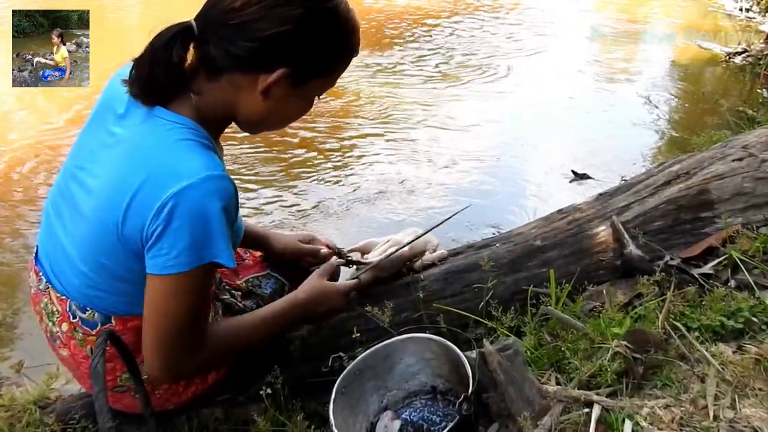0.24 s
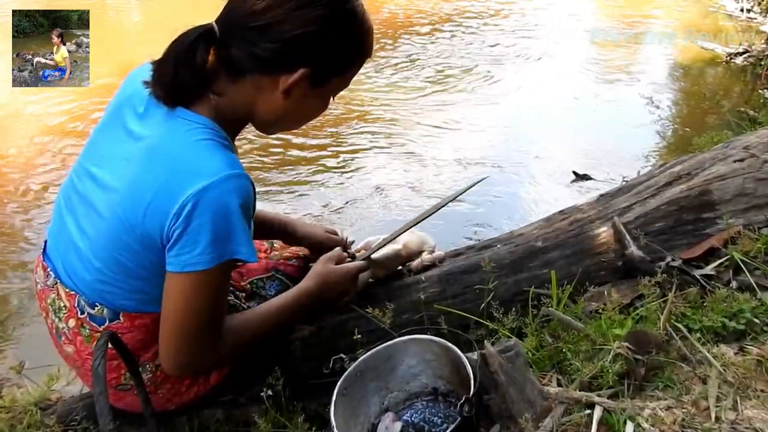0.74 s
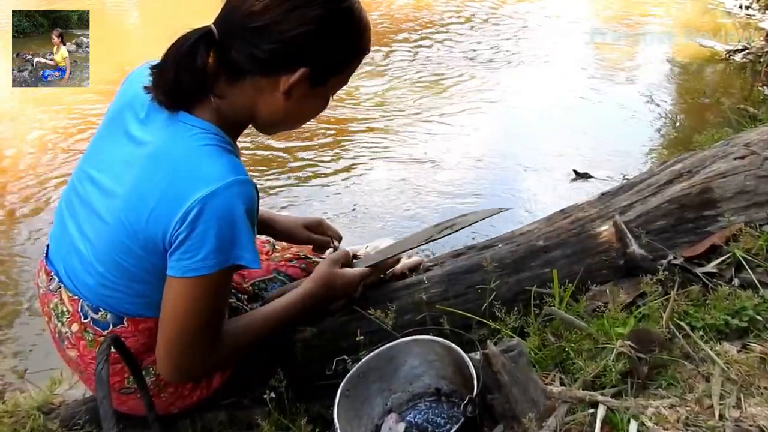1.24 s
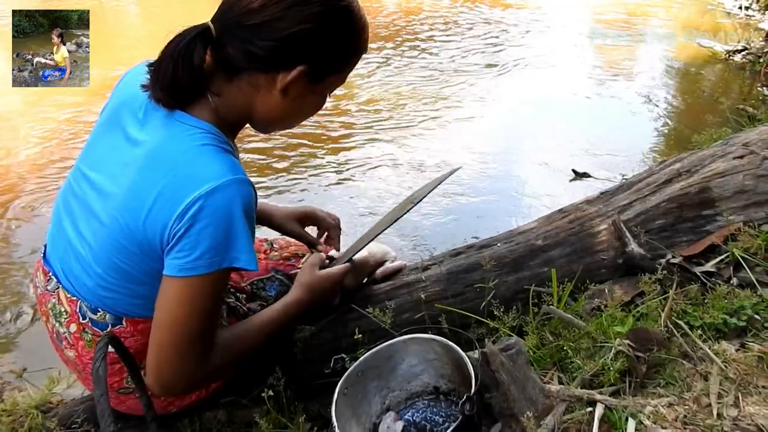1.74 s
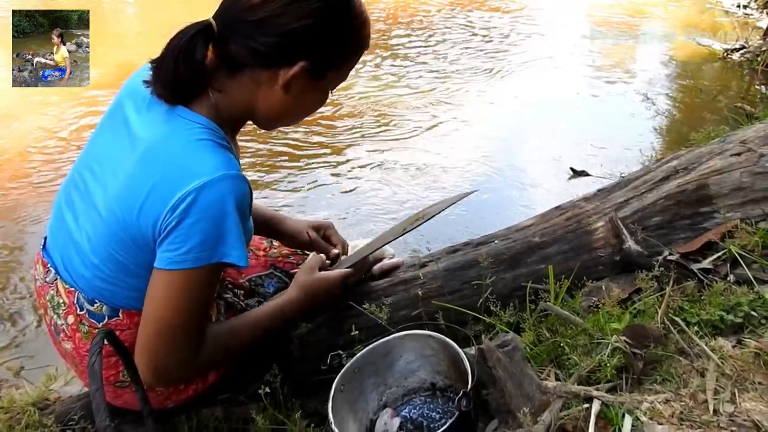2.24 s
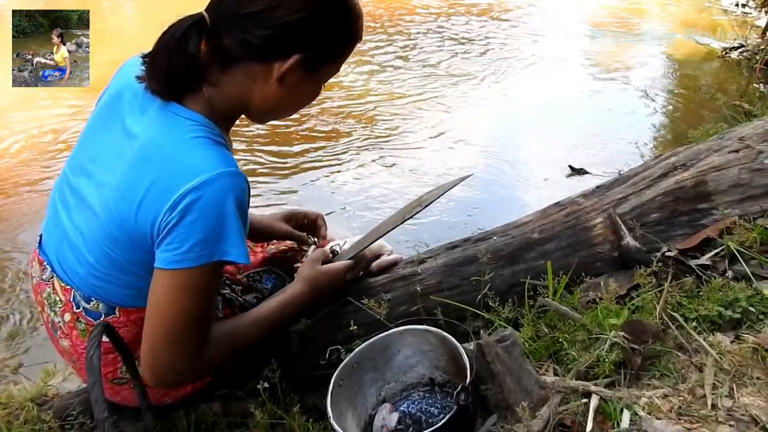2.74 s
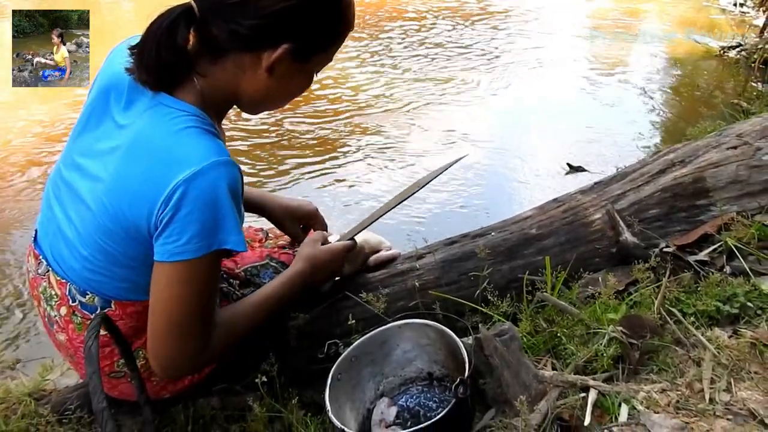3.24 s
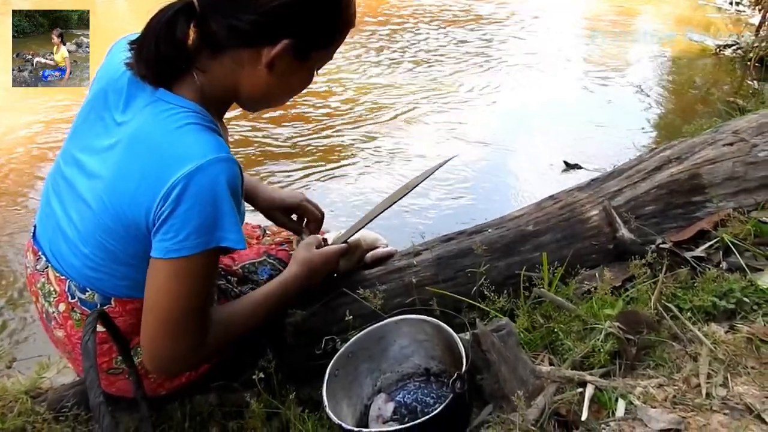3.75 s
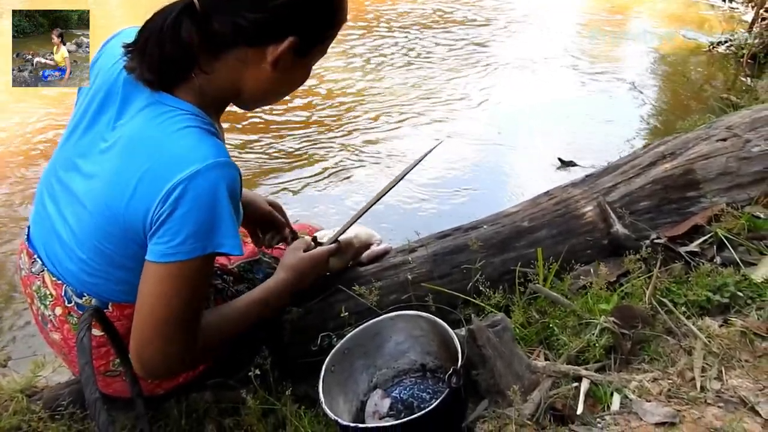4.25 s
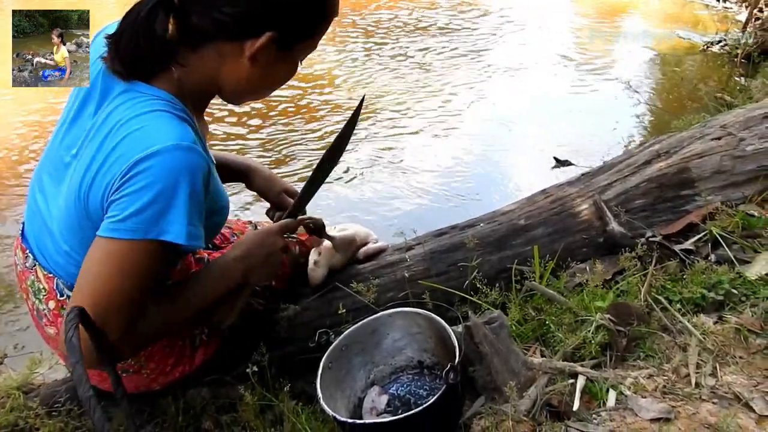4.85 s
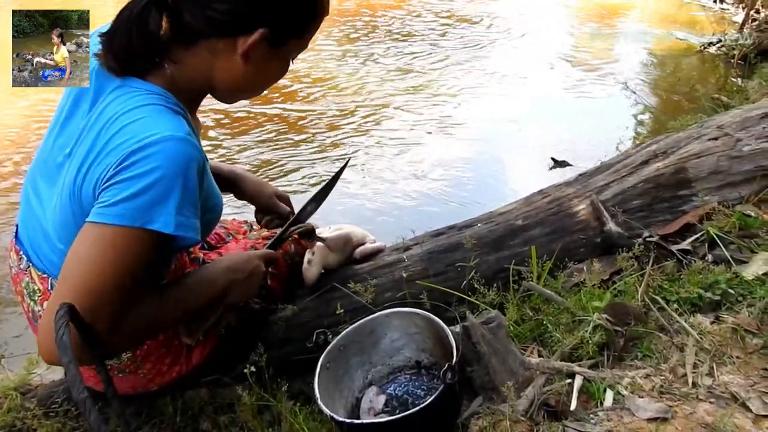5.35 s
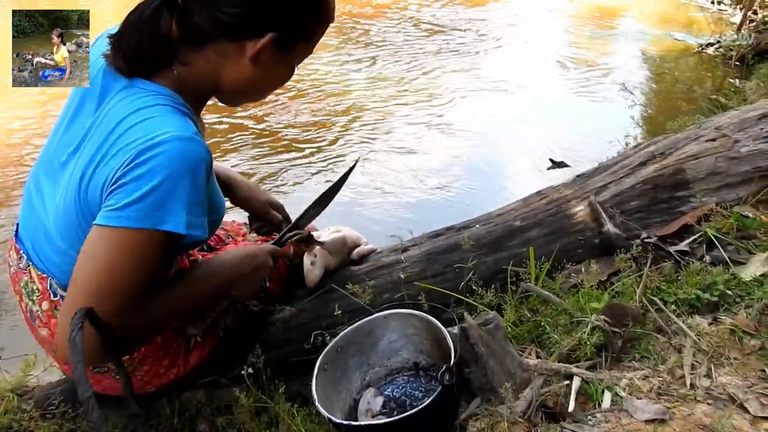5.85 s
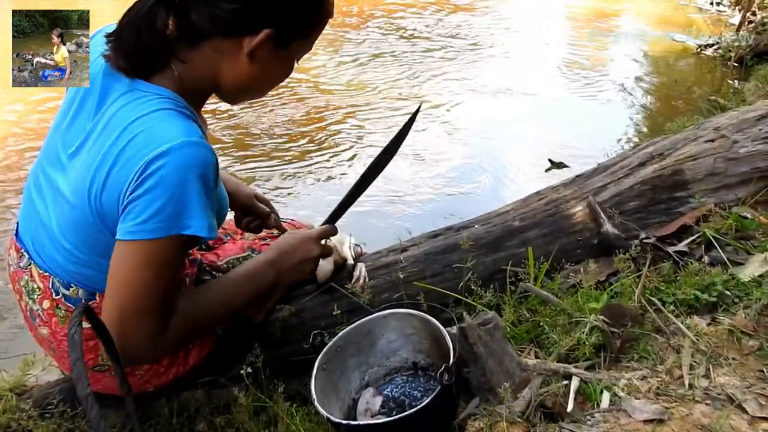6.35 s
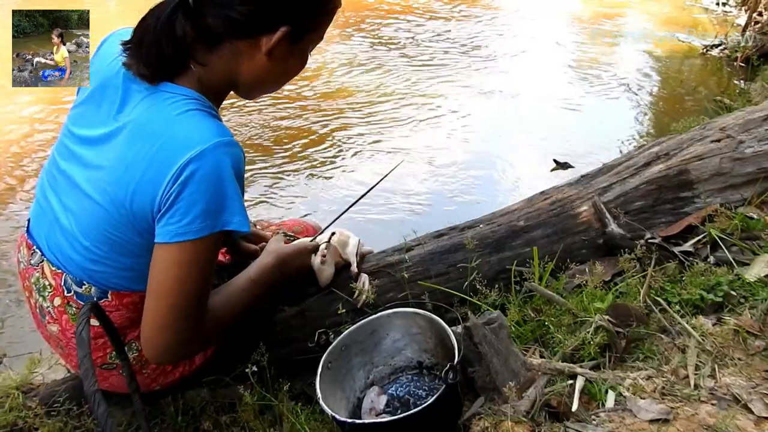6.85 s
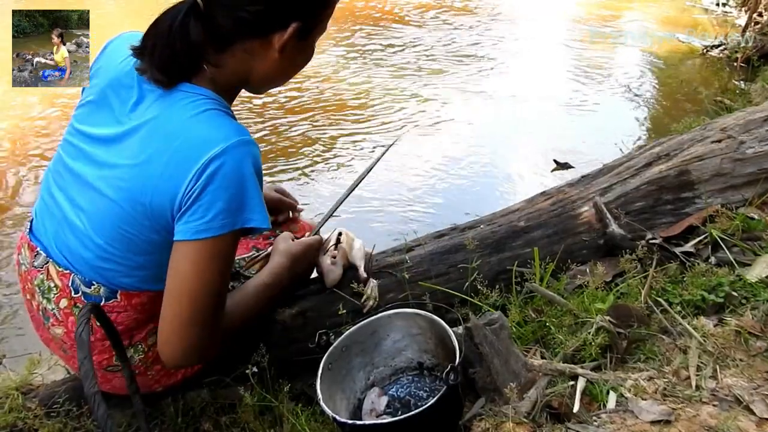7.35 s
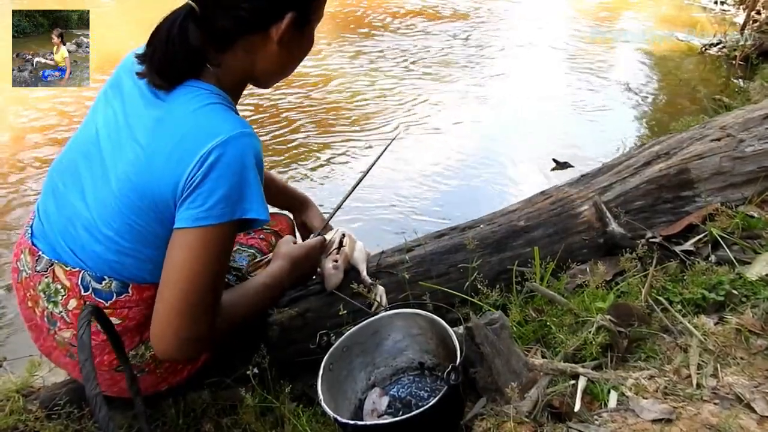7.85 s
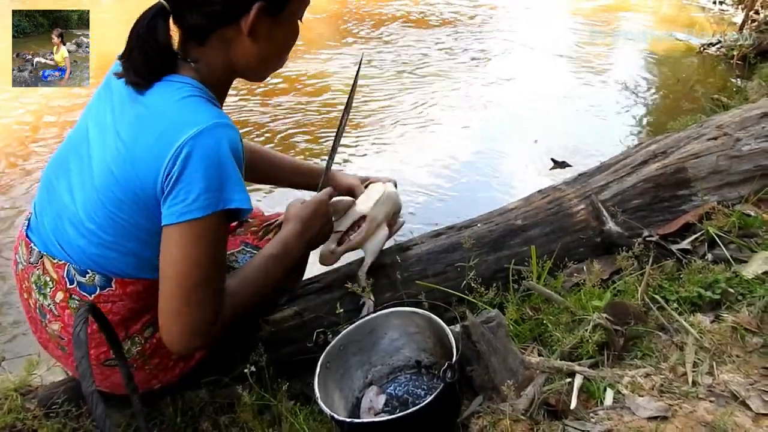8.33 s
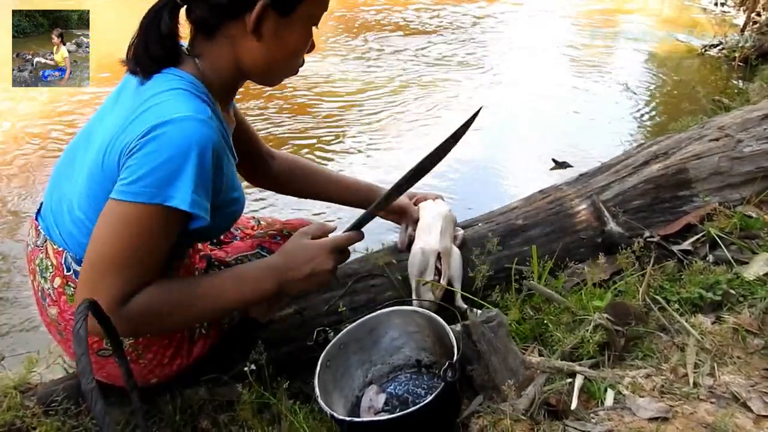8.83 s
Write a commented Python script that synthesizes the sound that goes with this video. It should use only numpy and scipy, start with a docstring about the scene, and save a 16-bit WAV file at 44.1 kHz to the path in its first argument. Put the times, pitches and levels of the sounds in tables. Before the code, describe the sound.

A shrill cicada drones on a fast wobbling pitch by a riverbank while a knife snicks and knocks softly on a log, then wind buffets the microphone.

```python
"""A riverbank on a hot day: one cicada drones on a wobbling pitch, a stack of sines scattered by moving leaves.
Close by a big knife works on a log: noise bursts for snicks, grains for wet rustles, ringing modes for dull knocks.
A bird, a gliding sine, whistles once; later gusts of low noise buffet the two microphone ports.
Behind them water babbles as ringing bubbles over noise bands, an engine hums far off on two sines,
and a far insect chorus hisses in filtered noise."""
import sys
import numpy as np
from scipy import signal
from scipy.io import wavfile
from scipy.ndimage import uniform_filter1d

SR = 44100
rng = np.random.default_rng(int(sys.argv[2]) if len(sys.argv) > 2 else 0)


def dump_mix(stems):
    """Bounce the given channels to the path in sys.argv[1] as a 16-bit WAV at rate SR."""
    frames = np.atleast_2d(stems).T  # one column per channel
    limited = np.clip(frames, -1, 1)  # hard clip at full scale
    pcm = np.round(limited * 32767).astype(np.int16)
    wavfile.write(sys.argv[1], SR, pcm)


N = 400861
T = np.arange(N) / SR   # time of every sample, in seconds


def from_db(db):
    """Decibels to gain."""
    return 10 ** (np.asarray(db) / 20)


def rms_one(x):
    """Scale to an rms (average strength) of 1."""
    return x / np.sqrt(np.mean(x ** 2) + 1e-20)


def in_time(rows):
    """Draw straight lines between the rows of a table, giving each column one value a sample."""
    seconds, *columns = np.transpose(rows)
    return [np.interp(T, seconds, column) for column in columns]


def at_hz(points, hz):
    """Read a spectrum table at one pitch, on a log-frequency axis."""
    table_hz, values = np.array(points)[:, 0], np.array(points)[:, 1]
    return np.interp(np.log(hz), np.log(table_hz), values)


def panned(x, pan_db):
    """Make two channels, the left louder than the right by pan_db."""
    return np.array([x * from_db(pan_db / 2), x * from_db(-pan_db / 2)])


def band(x, low_hz, high_hz):
    """Keep only the sound between two pitches."""
    sos = signal.butter(2, [low_hz, min(high_hz, .45 * SR)], "band", fs=SR, output="sos")
    return signal.sosfilt(sos, x)


def drift(rate_hz):
    """Slow random wandering of spread 1: noise at every 100th sample, smoothed twice, then joined by lines."""
    r = np.exp(-200 * np.pi * rate_hz / SR)
    noise = rng.standard_normal(N // 100 + 2002)
    slow = signal.lfilter([1], [1, -2 * r, r * r], noise)[2000:]   # drop the filter's start
    return np.interp(np.arange(N) / 100, np.arange(len(slow)), rms_one(slow))


def ring(clicks, hz, t60):
    """A unit click sets a sine of height 1 ringing; it fades by 60 dB in t60 seconds."""
    r, w = from_db(-60 / (t60 * SR)), 2 * np.pi * hz / SR
    return signal.lfilter([0, np.sin(w)], [1, -2 * r * np.cos(w), r * r], clicks + 1e-18)


SCATTER_T60_S = .39   # seconds for the scattered sound to fade by 60 dB


def scatter():
    """Echo patterns of trees and banks for both ears: dense noise that dies away; energy 1."""
    age = np.arange(round(SCATTER_T60_S * SR)) / SR
    tails = rng.standard_normal((2, len(age))) * from_db(-60 * age / SCATTER_T60_S)
    return tails / np.sqrt(np.sum(tails ** 2, axis=1, keepdims=True))


# How loud the cicada is and which side it is on; a fixed boost of 3 dB comes on top.
# Each row: time in seconds, level in dB before the boost, left minus right in dB.
CICADA_LEVEL = [(0.0, -44.5, -21), (0.12, -36.5, 1.5), (1.27, -37, 0), (2.28, -39, 0.0), (3.06, -37.5, 5),
                (4.22, -37.5, -1.5), (5.85, -38.5, 2.5), (6.18, -38, 1), (6.48, -38, 1.5), (8.4, -36.5, 5),
                (8.61, -36.5, 4.5), (8.81, -37.5, -1.0), (9.06, -36.5, 2), (9.09, -36, -7)]
# The overtones in its song, before scattering and levelling.
# Each row: multiple of the click rate, relative strength in dB, left minus right in dB.
CICADA_OVERTONES = [(4, -17, 2), (5, 1, 0), (6, -29.5, -0.5), (7, -44, 9), (8, -55, 2)]
CLICK_HZ, SAG_HZ_PER_S = 1531.5, .75   # middle of the pitch swing, and how fast it sinks
SWINGS_PER_S, FIRST_SWING = 12.374, -.3   # pitch swings a second; where in a swing the song begins (swings)
SWING_HZ, JITTER_HZ = 16.5, 1.8   # size of the swing and of its unsteadiness, at the click rate
DWELL = .1   # flattens the high turn and sharpens the dip
SWING_DB, LEFT_LEAD_S = .5, .000035   # louder at the high turn; earlier at the left port
LEAF_RATE_HZ, DIRECT_DB = .35, -3.5   # pace of the changing patterns; direct song against all the scatter


def cicada(count=4):
    """A clean overtone stack swings in pitch; most of it arrives scattered, in patterns that change as leaves move."""
    turn = 2 * np.pi * (FIRST_SWING + SWINGS_PER_S * T)
    swing = np.cos(turn) - DWELL * np.cos(2 * turn)
    unsteady = JITTER_HZ * (1 - .8 * swing) * drift(12.0)   # less steady at the low turn
    click_hz = CLICK_HZ - SAG_HZ_PER_S * T + SWING_HZ * swing + unsteady
    phase = 2 * np.pi * np.cumsum(click_hz) / SR
    left_lead = 2 * np.pi * CLICK_HZ * LEFT_LEAD_S
    phase = phase - phase[0] + [[left_lead], [0]]

    song = np.zeros((2, N))
    for multiple, db, side_db in CICADA_OVERTONES:
        song += panned(from_db(db), side_db)[:, None] * np.sin(multiple * phase)
    song *= from_db(SWING_DB * swing)

    # It was already singing: put half a second of mirrored song in front.
    earlier = np.pad(song, ((0, 0), (SR // 2, 0)), mode="reflect", reflect_type="odd")
    out = from_db(DIRECT_DB) * np.sqrt(count) * song
    for _ in range(count):
        scattered = signal.oaconvolve(earlier, scatter(), axes=1)[:, SR // 2:][:, :N]
        out += drift(LEAF_RATE_HZ) * scattered

    out /= np.sqrt(uniform_filter1d(out ** 2, size=SR // 3))   # even out the level over a third of a second
    level_db, pan_db = in_time(CICADA_LEVEL)
    return out * panned(np.sqrt(2) * from_db(level_db), pan_db)


KNIFE_LEFT_DB = 3   # the snicks are louder on the left by this much
# Short sharp sounds of the knife.
# Each row: start in seconds, peak in dB before panning, centre pitch in Hz, width as a pitch ratio.
KNIFE_SNICKS = [(0.566, -54.5, 1160, 1.08), (1.1643, -54, 1100, 1.2), (1.696, -54, 1250, 1.05),
                (2.1555, -50, 2600, 1.1), (2.166, -35.5, 4720, 1.4), (2.4369, -50, 2750, 1.2),
                (2.698, -49, 2240, 1.3), (3.1657, -53, 1110, 1.4), (3.1936, -45, 2390, 1.3),
                (3.2041, -45, 4440, 1.07), (3.6496, -53.5, 1500, 1.6), (4.163, -53, 1000, 1.18),
                (5.397, -50, 3300, 1.15), (5.482, -42, 5330, 1.05), (5.876, -37, 5400, 1.1),
                (5.898, -38, 5400, 1.2), (5.9405, -39, 5600, 1.2), (5.945, -29, 6300, 1.22),
                (8.739, -34, 5700, 1.3), (8.871, -56, 1680, 1.14)]
SNICK_FADE_S, SNICK_FADE_SLOPE = .0042, .5   # fade time at 1 kHz; higher snicks fade faster by this power


def snicks():
    """Each snick is a burst of noise that fades in milliseconds, kept to a band of pitches."""
    out, size = np.zeros((2, N)), SR // 25
    noises = rng.standard_normal((len(KNIFE_SNICKS), size))
    for (s, db, hz, width), noise in zip(KNIFE_SNICKS, noises):
        fade_s = SNICK_FADE_S * (1000 / hz) ** SNICK_FADE_SLOPE
        width = max(width, 1.03)
        burst = noise * np.exp(-np.arange(size) / SR / fade_s)
        burst = band(burst, hz / width, hz * width)
        burst = band(burst, hz / width / 1.3, hz * width * 1.3)
        burst = from_db(db) * burst / np.abs(burst).max()
        out[:, round(s * SR):][:, :size] += panned(burst, KNIFE_LEFT_DB)
    return out


# Wet rustles of hands and blade.
# Each row: time of the peak in seconds, length in seconds, strength in dB before the swell shapes it.
WET_RUSTLES = [(0.483, .09, -58), (1.088, 0.11, -61), (1.628, .115, -56), (2.18, .06, -58),
               (2.532, 0.074, -60), (3.372, 0.17, -59), (5.872, 0.049, -57), (5.938, 0.14, -51.5),
               (6.045, 0.041, -52), (7.083, 0.12, -60.5), (8.504, .07, -62), (8.821, 0.072, -53)]
GRAIN_SHARE, RUSTLE_RISE = .2, .35   # share of samples with a grain; share of the length spent rising
RUSTLE_LOW_HZ, RUSTLE_HIGH_HZ, RUSTLE_HZ_PER_DB = 1500, 5500, 366   # band at -60 dB, brighter when harder


def rustles():
    """Dense random grains of uneven size are heard under a swell that rises and falls."""
    size_db = 2.5 * np.minimum(rng.exponential(1, N), 4) + 3 * drift(150)
    present = rng.random(N) < GRAIN_SHARE
    grains = rng.standard_normal((2, N)) * from_db(size_db) * present
    grains[1] = 0.34 * grains[0] + 0.9 * grains[1]   # the two sides are partly alike
    out = np.zeros((2, N))
    for peak, length, db in WET_RUSTLES:
        start = peak - RUSTLE_RISE * length
        high_hz = RUSTLE_HIGH_HZ + RUSTLE_HZ_PER_DB * (db + 60)
        span = slice(round(start * SR), round((start + length) * SR))
        grain = band(grains[:, span], RUSTLE_LOW_HZ, high_hz)
        grain = band(grain, RUSTLE_LOW_HZ / 2, high_hz * 1.15)
        swell = np.interp(T[span], [start, peak, start + length], [0, 1, 0])
        out[:, span] += from_db(db) * swell * rms_one(grain)
    return out


# Dull knocks on the log. Each row: start in seconds, strength in dB, hardness in Hz (one over contact time).
LOG_KNOCKS = [(2.904, -47.5, 403), (2.972, -56, 250), (3.04, -51, 250), (3.096, -56, 300),
              (4.189, -53, 300), (8.488, -67, 900), (8.7234, -45, 1190)]
# The tones the log rings with. Each row: pitch in Hz, relative strength in dB, time to fade by 60 dB in seconds.
LOG_TONES = [(164.4, -7, 0.36), (230, -0.5, 0.12), (333, 0.5, 0.069), (520, -13, 0.011), (622, 9, 0.057),
             (1250, -6, .02), (834, -23, .04), (1900, 8.5, .03)]


def knocks():
    """Each blow is a smooth push that sets the log's tones ringing."""
    blows = np.zeros(N)
    for s, db, hard_hz in LOG_KNOCKS:
        contact = np.hanning(round(SR / hard_hz))   # a soft blow lasts longer and misses the upper tones
        blows[round(s * SR):][:len(contact)] += from_db(db) * contact / contact.sum()
    return sum(from_db(db) * ring(blows, hz, t60) for hz, db, t60 in LOG_TONES)


# The path of the bird's whistle. Each row: time in seconds, pitch in Hz, level in dB before the echoes.
BIRD_WHISTLE = [(2.81, 4390, -65), (2.835, 4100, -66), (2.87, 4390, -63), (2.91, 5100, -60),
                (2.94, 5500, -57), (2.975, 5620, -58)]
BIRD_ECHO_S = .04   # delay of the echo from the far bank


def bird():
    """One whistle dips, then rises; it is thrown back by the far bank and smeared by the trees."""
    hz, db = in_time(BIRD_WHISTLE)
    start, end = BIRD_WHISTLE[0][0], BIRD_WHISTLE[-1][0]
    gate = np.interp(T, [start - .01, start, end, end + .015], [0, 1, 1, 0])
    call = np.sqrt(2) * from_db(db) * gate * np.sin(2 * np.pi * np.cumsum(hz) / SR)
    call = call + .4 * np.roll(call, round(BIRD_ECHO_S * SR))
    smeared = signal.oaconvolve(call[None], scatter(), axes=1)[:, :N]
    return call + 1.1 * smeared


# Steady strength of the gusts at each port, which sets level and brightness together.
# Each row: time in seconds, left strength in dB, right strength in dB.
GUST_STRENGTH = [(4.6, -75, -69), (5.1, -55.5, -66), (5.45, -36, -41.5), (5.72, -54, -43.5),
                 (5.86, -49, -32), (5.93, -42, -66), (6.2, -56, -59.5), (6.9, -55, -61.5), (7.2, -44, -56),
                 (7.4, -38.5, -72), (7.45, -56, -70), (7.65, -31, -51), (7.95, -60.5, -59), (8.3, -49, -71),
                 (8.56, -49.5, -60), (8.65, -39, -54), (8.9, -51, -43), (9.09, -45.5, -48.5)]


def gusts():
    """Lumpy low noise, its own at each port; strong gusts reach higher in pitch."""
    out = np.zeros((2, N))
    for port, strength_db in enumerate(in_time(GUST_STRENGTH)):
        gain = from_db(strength_db) * (T > GUST_STRENGTH[0][0])   # silent before the first row
        lumps = from_db(3.0 * drift(25.0))
        low = band(rng.standard_normal(N) * lumps, 35.4, 102)
        low = rms_one(band(low, 28.4, 154))
        high = band(rng.standard_normal(N) * lumps, 74, 205)
        high = rms_one(band(band(high, 71, 204), 45, 210))
        out[port] = 1.44 * gain * low + 11.0 * gain ** 1.73 * high   # the higher part grows faster
    return out


# Eddies that slap the ports.
# Each row: time of the middle in seconds, nominal peak in dB at the nearer port, left minus right in dB.
EDDY_SLAPS = [(4.716, -41, 13), (5.202, -30.5, 24), (5.344, -28, 13), (5.366, -26.5, 23), (5.407, -25, -7),
              (5.417, -23.5, 11), (5.507, -22, 13), (5.542, -28, 5), (5.591, -24, -15), (5.641, -23.5, -21),
              (5.748, -20.5, -25), (5.802, -20, -16), (5.835, -22.5, -14), (5.851, -22, -6),
              (6.345, -33.5, 20), (6.464, -34, 21), (6.826, -31, -12), (6.992, -30, -14),
              (7.196, -29.5, 24), (7.311, -26, 31), (7.383, -22, 33), (7.545, -29, 22), (7.616, -15, 22),
              (7.661, -17.5, 32), (7.685, -18.5, 30), (7.805, -28.5, -7), (8.617, -25, 22),
              (8.641, -19, 14), (8.676, -27, 23), (8.725, -33, -17), (8.762, -30, -5), (8.831, -33, 1),
              (8.908, -31, 19), (8.94, -36, -5)]
SLAP_HZ, SLAP_HZ_PER_DB = 94.4, 3.15   # pitch at -28 dB and its rise with strength, before random detuning
SLAP_S, SLAP_EDGE = .0048, 1.6   # half length; shape (2 round, 1 pointed)
CRACK_DB, CRACK_GROWTH = -52.5, 4.2   # level of the hiss in a slap of -18 dB; dB gained per dB of slap
CRACK_HZ, CRACK_S = (200, 725), .0038   # band and half length of that hiss


def slaps():
    """Single eddies push a port with a short low wave, each side at its own phase, and a little hiss."""
    out = np.zeros((2, N))
    half = SR // 25
    age = np.arange(-half, half) / SR
    chances = rng.random((len(EDDY_SLAPS), 3))
    airs = rng.standard_normal((len(EDDY_SLAPS), 2, len(age)))
    for (s, db, side_db), (*turns, detune), air in zip(EDDY_SLAPS, chances, airs):
        hz = (SLAP_HZ + SLAP_HZ_PER_DB * (db + 28)) * (.9 + .2 * detune)
        wave = np.cos(2 * np.pi * (hz * age + np.array(turns)[:, None]))
        push = wave * np.exp(-np.abs(age / SLAP_S) ** SLAP_EDGE)
        crack_db = CRACK_DB + 18 + (CRACK_GROWTH - 1) * (db + 18)   # relative to the push
        push += from_db(crack_db) * rms_one(band(air, *CRACK_HZ)) * np.exp(-(age / CRACK_S) ** 2)
        sides = panned(from_db(db - abs(side_db) / 2), side_db)[:, None]
        out[:, round(s * SR) - half:][:, :len(age)] += sides * push
    return out


# How loud the water babbles. Each row: time in seconds, level in dB.
BABBLE_LEVEL = [(0, -67.5), (4.55, -65.5), (4.85, -72.5), (9.1, -81)]


def babble(per_s, cycles):
    """Bubbles come in loose clumps and ring a few cycles; big ones are struck more gently."""
    strengths = from_db(2.5 * np.minimum(rng.exponential(1, N), 4)) * rng.choice([-1, 1], N)
    born = rng.random(N) < per_s * from_db(2.5 * drift(8.0)) / SR
    dealt = rng.integers(0, 16, N)   # which of 16 pitches each bubble gets
    rings = np.zeros(N)
    for k, hz in enumerate(np.geomspace(160, 1500, 16)):
        clicks = strengths * born * (dealt == k)
        rings += (hz / 500) ** 0.61 * ring(clicks, hz, cycles / hz)
    return from_db(in_time(BABBLE_LEVEL)[0]) * rms_one(rings)


# Spectrum of water and far insects, before the overall level is set.
# Each row: pitch in Hz, relative strength in dB per Hz.
BANK_SPECTRUM = [(25, -13), (50, 0.5), (100, 2), (250, -12.5), (900, -17), (2000, -19), (3500, -17.5),
                 (5200, -15.5), (7000, -1), (9000, -40)]
# How alike left and right are. Each row: pitch in Hz, likeness (1 the same, 0 unrelated, below 0 opposed).
BANK_LIKENESS = [(60, 0.96), (180, 0.17), (550, 0.39), (1650, 0.57), (4970, 0.67), (15000, -0.022)]
BANK_DB = -57.5   # overall level


def water_and_insect_noise(patchy_db):
    """Half-octave bands of stereo noise, each with its own level, flicker and left-right likeness."""
    out, together = 0, drift(4.8)
    edges = 25 * 2 ** np.arange(0, 9.1, .5)
    white = rng.standard_normal((2, 2, N))
    for k, (low, high) in enumerate(zip(edges, edges[1:])):
        mid, side = band(white[k % 2], low, high)   # neighbouring bands use different noise
        hz = np.sqrt(low * high)
        alike = np.clip(at_hz(BANK_LIKENESS, hz), -1, 1)
        flicker_db = patchy_db * (0.29 * together + drift(10.6))
        gain = from_db(at_hz(BANK_SPECTRUM, hz) + flicker_db)
        out = out + gain * (np.sqrt(1 + alike) * mid + np.sqrt(1 - alike) * side * [[1], [-1]])
    # air and leaves swallow the far top
    dulled = signal.sosfilt(signal.butter(12, 8800, fs=SR, output="sos"), out)
    return from_db(BANK_DB) * rms_one(dulled)


# Far engine. Each row: time in seconds, level of the first order in dB, level of the second in dB (both waver).
ENGINE_LEVELS = [(0, -58, -73), (1.3, -63.5, -67), (1.7, -61.5, -80), (2.6, -59.5, -70), (3.0, -68, -70.5),
                 (3.5, -64.5, -72.5), (5.0, -63, -87), (9.1, -65, -60)]
HUM_HZ, HUM_WAVER_HZ = 69.1, 1.197   # pitch of the first order and how far it wanders


def engine_hum():
    """Two engine orders, the second at twice the pitch, waver a little in pitch and level."""
    phase = 2 * np.pi * np.cumsum(HUM_HZ + HUM_WAVER_HZ * drift(2.073)) / SR
    out = np.zeros(N)
    for order, db in zip((1, 2), in_time(ENGINE_LEVELS)):
        out += np.sqrt(2) * from_db(db + 1.5 * drift(4.0)) * np.sin(order * phase)
    return out


# Faint bands from far away. Each row: centre pitch in Hz, width in Hz, middle level in dB.
FAINT_BANDS = [(830.3, 21, -79), (5100, 21, -75), (6930, 610, -62)]
CHORUS_HZ, CHORUS_DB = (5000, 8360), -58.5   # band of the far insects and its middle level


def insect_chorus():
    """Far insects blur into a plateau of hiss and a few faint bands, all wavering slowly in level."""
    plateau = signal.butter(8, CHORUS_HZ, "band", fs=SR, output="sos")
    hiss = signal.sosfilt(plateau, rng.standard_normal((2, N)))
    out = from_db(CHORUS_DB + 2.0 * drift(3.0)) * rms_one(hiss)
    for hz, width_hz, db in FAINT_BANDS:
        faint = band(rng.standard_normal((2, N)), hz - width_hz / 2, hz + width_hz / 2)
        out += from_db(db + 1.2 * drift(1.6)) * rms_one(faint)
    return out


def scene():
    """Everything at the microphone, added together."""
    near = cicada() + snicks() + rustles() + knocks() + bird() + gusts() + slaps()
    water = babble(per_s=1200, cycles=7.6) + water_and_insect_noise(patchy_db=1.46)
    return near + water + engine_hum() + insect_chorus()


# A rough change of sample rate leaves copies of the treble, shifted in pitch.
# Each row: shift in steps of IMAGE_HZ, strength in dB.
TREBLE_COPIES = [(-1, -29), (1, -34.5), (2, -45.5)]
IMAGE_HZ, TREBLE_HZ = 3900, 7700   # one step of shift; centre of the copied treble
CUTOFF_HZ = 15750   # top of the recorded range


def record(dry):
    """Deep bass is lost, the strongest treble is copied at shifted pitches, then the top is cut."""
    dry = signal.sosfilt(signal.butter(2, 45, "high", fs=SR, output="sos"), dry)
    lowered = dry * np.exp(-2j * np.pi * TREBLE_HZ * T)   # the strong treble band, moved down to zero
    treble = 2 * signal.sosfilt(signal.butter(5, 700, fs=SR, output="sos"), lowered)
    wet = dry
    for steps, db in TREBLE_COPIES:
        copy_hz = TREBLE_HZ + steps * IMAGE_HZ
        wet = wet + from_db(db) * np.real(treble * np.exp(2j * np.pi * copy_hz * T))
    return signal.sosfilt(signal.ellip(10, .3, 70, CUTOFF_HZ, fs=SR, output="sos"), wet)


dry = scene()
out = record(dry)
dump_mix(out)
```